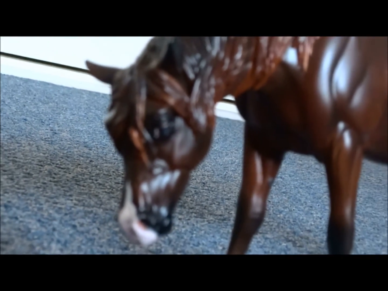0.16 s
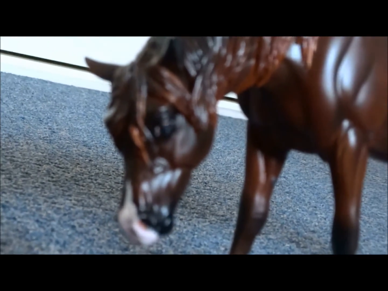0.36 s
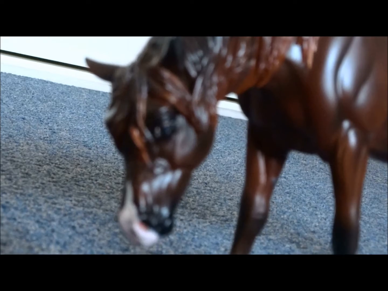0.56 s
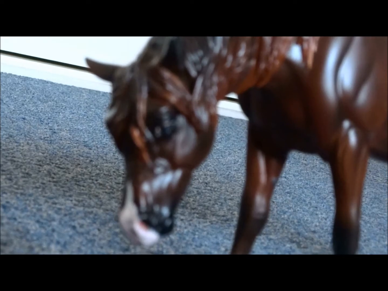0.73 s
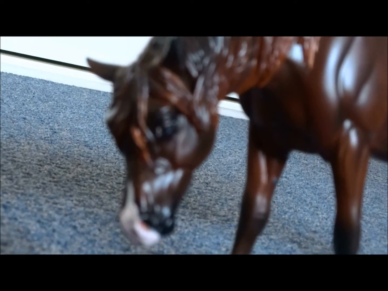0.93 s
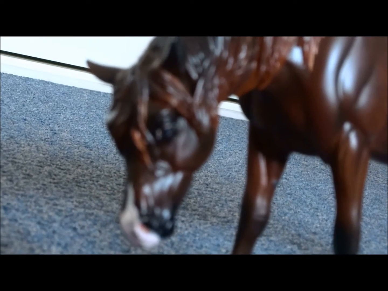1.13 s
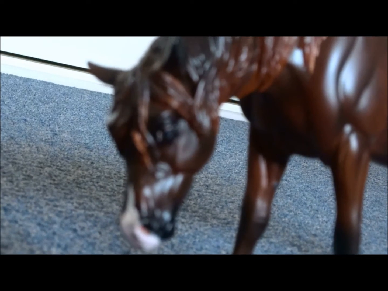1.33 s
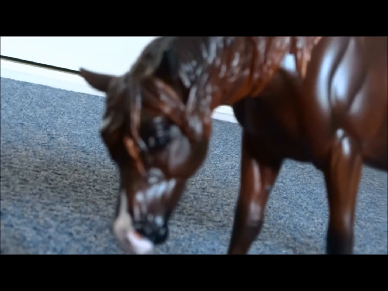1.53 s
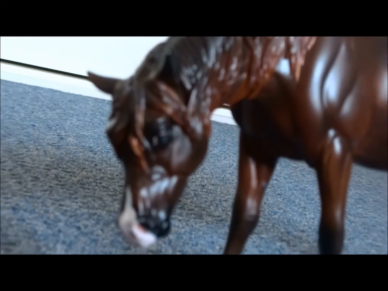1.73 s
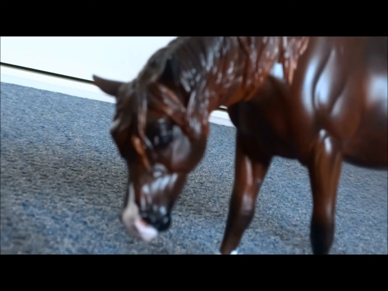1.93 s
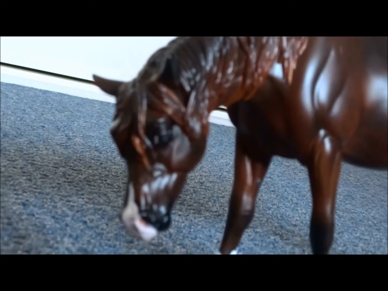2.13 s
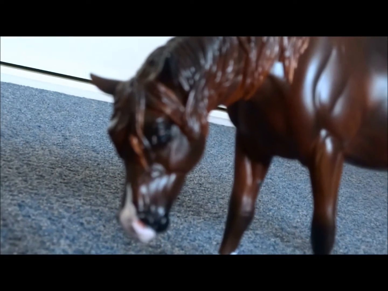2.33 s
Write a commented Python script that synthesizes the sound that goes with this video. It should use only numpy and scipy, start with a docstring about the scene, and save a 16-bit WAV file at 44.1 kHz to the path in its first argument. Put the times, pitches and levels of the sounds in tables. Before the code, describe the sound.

A camera autofocus motor whirs faintly in two short spells, with small clicks between.

```python
"""A quiet room, heard through the body of a camera whose lens hunts for focus.
Twice the motor runs fast, stops and creeps back: friction rings the barrel and the motor ring,
the gears whine and click, the ring squeaks. Between the spells the mechanism ticks faintly,
clacks twice and takes up its slack. A dull rustle and the room tone lie underneath."""
import sys
import numpy as np
from scipy import signal
from scipy.fft import rfft, irfft, next_fast_len
from scipy.io import wavfile
from scipy.ndimage import uniform_filter1d, map_coordinates

SR = 44100
rng = np.random.default_rng(int(sys.argv[2]) if len(sys.argv) > 2 else 0)


def file_out(sig):
    """Save sig as 16-bit WAV at sys.argv[1]."""
    # one column per channel
    cols = np.atleast_2d(sig).T
    # limit, then scale
    lim = np.clip(cols, -1, 1)
    pcm = np.round(lim * 32767).astype(np.int16)
    wavfile.write(sys.argv[1], SR, pcm)


N = 105443

# fast motor runs, one list each: time_s, barrel_db, low_ring_db, high_ring_db
FAST_LEVELS = [
    [(0, -45, -54, -55), (.014, -52.5, -58, -55), (.021, -47, -53, -49.5), (.030, -53, -67, -66),
     (.05, -73, -88, -86)],
    [(1.375, -67, -68, -79), (1.41, -51.5, -57.5, -67.5), (1.45, -43.5, -46.5, -55), (1.472, -45, -60, -59),
     (1.505, -50, -56.5, -59.5), (1.545, -49.5, -56.5, -54.5), (1.568, -50.5, -52, -47.5),
     (1.64, -50.5, -53.5, -54.5), (1.745, -50, -52, -50.5), (1.87, -51.5, -54.5, -56.5),
     (1.909, -52, -55.5, -58), (1.919, -51, -48.5, -49.5), (1.929, -63, -71, -74), (1.96, -80, -72, -74)],
]
# slow motor runs, one list each: time_s, rumble_db, barrel_db, low_ring_db, high_ring_db
SLOW_LEVELS = [
    [(.084, -57, -71, -80, -82), (.092, -70, -54, -69, -68), (.112, -65, -54.5, -57, -59.5),
     (.13, -69, -50, -59, -72), (.146, -71, -43.5, -55, -52), (.165, -58, -55, -55, -57.5),
     (.235, -52.5, -53.5, -60.5, -58.5), (.285, -60, -51.5, -58.5, -55), (.297, -71, -59.5, -67, -73),
     (.33, -55.5, -64.5, -74, -79), (.35, -75, -68, -88, -90)],
    [(1.984, -78, -79, -78, -80), (1.99, -80, -56, -75, -68), (2.005, -59, -55.5, -56.5, -60),
     (2.022, -73, -54.5, -66, -63), (2.036, -54.5, -48, -57, -62), (2.065, -73, -55, -57, -56.5),
     (2.085, -54, -53.5, -58, -57), (2.12, -53.5, -52, -56.5, -58.5), (2.184, -61, -54, -57, -52.5),
     (2.2, -58, -57.5, -69, -74), (2.24, -76, -74, -80, -74)],
]
# motor ring resonances: freq_hz, width_hz, fast_db, slow_db
RING_MODES = [(3550, 193, -10, -8.5), (4690, 160, -8, -4), (5010, 160, -7, -3.5), (5330, 280, -11.5, -5.5),
              (5850, 300, -9.5, -10), (6320, 250, -3, -7.5), (6810, 200, -4, -4.5), (7560, 125, -2.5, -4.5),
              (8280, 110, 4.5, -11), (8790, 200, -2, -17), (10250, 460, -10, -21), (10890, 320, 3, -5.5),
              (10970, 410, 1, -7.5), (11600, 88, -5.5, -41)]
# resonances of barrel, squeak, housing and idle tick: freq_hz, width_hz, gain_db
BARREL_MODES = [(570.6, 50.6, -1.5), (883, 117, -8), (1092, 46, 2.5), (1194, 71, 2), (1318, 183, -1.5),
                (1506, 145, -5), (1694, 53, 2.5), (1865, 64, -7), (2160, 63, -31.5), (2530, 130, -22),
                (2830, 130, -14.5)]
SQUEAK_MODES = [(4710, 300, 0)]
HOUSING_MODES = [(265, 157, -17), (541, 90, -2), (690, 145, -1.5), (1003, 133, 1), (1436, 280, -4.5),
                 (1568, 135, -1), (1845, 70, 2), (2553, 124, -3), (2888, 80, -3.5), (3510, 264, -4.5),
                 (4750, 250, -5.5), (6660, 1900, -11.5), (7650, 1500, -9), (8360, 430, -2.5)]
IDLE_MODES = [(509, 56, 4), (627, 70, -3.5), (844, 47, 0), (1450, 320, -37)]
# gear mesh overtones: harmonic, level_db
WHINE_HARMONICS = [(3, -3.5), (5, -5.5), (6, 0), (7, 3), (9, -2), (10, -6)]
# gear train contacts: time_s, peak_db, bass_db, treble_db, cutoff_hz
GEAR_CLICKS = [(.1135, -46, -2, 0, 9000), (0.1269, -36, -12, 11, 12000), (0.1342, -44.5, 19, -3, 4000),
               (1.1336, -40.5, 15, 5, 9000), (1.1378, -28, -8, 4, 3800), (1.161, -27, 4, -9, 8400),
               (1.2632, -47.5, -15, -2, 9000), (1.3825, -40, -9, 3, 3320), (1.403, -31, -10, -10, 9000),
               (1.4405, -25.5, -3, -3, 9100), (1.4537, -19, -0.5, 0.5, 8500),
               (1.488, -20.5, 15.5, 8.5, 9330), (1.535, -38.5, -2, 7, 5000), (1.99, -54, -6, -10, 1990),
               (2.0108, -30.5, -10, 12, 9300), (2.04, -51, -4, -5, 6000), (2.07, -38, -11, 5, 9500),
               (2.08, -43.5, 11, -5, 4500), (2.1146, -39.5, 6, -6, 1860)]
# stick-slip of the ring: centre_s, half_length_s, level_db
RING_SQUEAKS = [(0.115, .003, -50), (0.145, 0.0083, -51), (.173, .003, -52), (1.432, 0.0059, -42.5),
                (1.443, .003, -38.5), (2.007, 0.0015, -49.5), (2.039, 0.0034, -46), (2.069, 0.011, -47)]
# lens inching forward after the clacks: start_s, stop_s, level_db
CREEP_MOVE = (1.166, 1.272, -56.5)
# rustle leading into the second spell: time_s, level_db
RUSTLE_LEVELS = [
    [(.95, -87), (1.06, -67.5), (1.29, -66.5), (1.36, -66), (1.4, -64.5), (1.5, -81)],
]
# spectral shapes of the friction noises and room tone: freq_hz, gain_db
RING_EQ = [(1000, -30), (2200, 8), (3400, 4.5), (9000, -0.5), (9500, -2), (10000, 5), (11600, 0),
           (12300, 12), (13500, -13), (15000, -38)]
BARREL_EQ = [(100, -6), (400, -3.5), (1850, 1.5), (2050, -1), (2800, -1.5), (3200, -16), (8000, -35)]
RUMBLE_EQ = [(40, -18), (130, -23.5), (250, -10.5), (480, -3), (600, 1.5), (690, -6.5), (850, -5),
             (1100, -54), (3000, -58)]
CREEP_EQ = [(100, -19), (560, 5.5), (750, 2.5), (1800, -5), (2100, -9), (2600, -3), (4200, -12), (4800, -7),
            (6100, -20), (7200, -2), (8400, -4), (9500, -24), (14000, -32)]
RUSTLE_EQ = [(50, -3), (170, 1.5), (550, 4.5), (1100, -6.5), (2500, -18), (6000, -30), (12000, -45)]
ROOM_EQ = [(12, -41), (20, -11), (136, -6.5), (180, -5.5), (213, -1), (273, -8.5), (305, -3.5), (332, -7.5),
           (414, -2), (683, -7.5), (743, -3.5), (1040, -8.5), (2080, -13.5), (8350, -20.5), (15400, -27.5)]
# stereo width: freq_hz, side_gain_db
LENS_SIDE = [(200, -10.5), (600, -7.5), (1100, -7.5), (1700, -11.5), (2600, -6), (5000, -15),
             (10000, -13.5)]
ROOM_SIDE = [(60, -19), (180, -4.5), (550, 1), (1640, 2), (4960, -2.5), (14900, -26.5)]

FAST_GRAIN, SLOW_GRAIN = .15, .3  # friction roughness: std of log gain


def fast_runs(split_hz=7850, surge_db=4, whine_db=-6.5):
    """Motor at speed: friction drives a bright pulsing ring over the barrel and gear whine."""
    gear_gain, low_gain, high_gain = envelopes(FAST_LEVELS)
    modes = [(hz, width_hz, db) for hz, width_hz, db, _ in RING_MODES]
    ring = filtered(friction(FAST_GRAIN), resonances(modes), eq(RING_EQ))
    low_band = filtered(ring, lambda f: f < split_hz)
    low_ring = unit(low_band * drive_surge(surge_db / 2))
    high_ring = unit((ring - low_band) * drive_surge(surge_db))
    rub = barrel(FAST_GRAIN, flutter_db=2.6)
    whine = amp(whine_db) * np.array([gear_whine(), gear_whine()])
    return gear_gain * unit(rub + whine) + low_gain * low_ring + high_gain * high_ring


def slow_runs(split_hz=6100):
    """Motor creeping back: rougher friction, a duller whirr with a rumble."""
    rumble_gain, barrel_gain, low_gain, high_gain = envelopes(SLOW_LEVELS)
    modes = [(hz, width_hz, db) for hz, width_hz, _, db in RING_MODES]
    ring = filtered(friction(SLOW_GRAIN) * drive_surge(depth_db=.9), resonances(modes), eq(RING_EQ))
    low_band = filtered(ring, lambda f: f < split_hz)
    rumble = rumble_gain * unit(filtered(friction(SLOW_GRAIN), eq(RUMBLE_EQ)))
    rub = barrel_gain * barrel(SLOW_GRAIN, flutter_db=3.2)
    return rumble + rub + low_gain * unit(low_band) + high_gain * unit(ring - low_band)


def drive_surge(depth_db, rate_hz=60, crest_s=1.7517):
    """Gain of the drive pushing the motor in slightly uneven pulses."""
    cycles = rate_hz * (clock() - crest_s) + .073 * wobble(29.76)
    return amp(depth_db * np.cos(2 * np.pi * cycles))


def barrel(grain, flutter_db, tooth_hz=181):
    """Gear teeth rub and ring the barrel."""
    flutter = amp(flutter_db * np.sin(2 * np.pi * tooth_hz * clock()))
    return unit(filtered(friction(grain) * flutter, resonances(BARREL_MODES), eq(BARREL_EQ)))


def gear_whine(pitch_hz=186, wander=.0106):
    """Gear mesh overtones, unsteady in pitch and level."""
    phase = 2 * np.pi * np.cumsum(pitch_hz * (1 + wander * wobble(25.04))) / SR
    return unit(sum(amp(db + 1.4 * wobble(30.15)) * np.sin(k * phase + rng.uniform(0, 2 * np.pi))
                    for k, db in WHINE_HARMONICS))


def gear_clicks(blow=4.0, click_t60_s=.007, rattle_t60_s=.055, bass_hz=660, treble_hz=3900):
    """Parts scrape, strike and rattle; each contact rings the housing."""
    out, lead = np.zeros((2, N + SR)), SR // 50
    t = (np.arange(SR // 7) - lead) / SR
    scrape = amp(-10) * np.exp(-np.abs(t) / .003)
    decay = amp(-60 * np.abs(t) / click_t60_s)
    rattle = amp(-16 - 60 * np.abs(t) / rattle_t60_s)
    envelope = np.where(t < 0, scrape, decay + rattle)
    for time_s, peak_db, bass_db, treble_db, cutoff_hz in GEAR_CLICKS:
        force = rng.standard_normal((2, len(t))) * envelope
        force[0, lead + SR // 2000] += blow  # mid only
        bass = lambda f: amp(bass_db / (1 + (f / bass_hz) ** 4))
        treble = lambda f: amp(treble_db * (1 - 1 / (1 + (f / treble_hz) ** 4)))
        lowpass = lambda f: 1 / np.sqrt(1 + (f / cutoff_hz) ** 8)
        hit = filtered(force, resonances(HOUSING_MODES), bass, treble, lowpass)
        start = round(time_s * SR) - lead
        out[:, start:start + len(t)] += amp(peak_db) * hit / np.abs(hit[0]).max()
    return out[:, :N]


def ring_squeaks():
    """The ring catches briefly and sings on one resonance."""
    swell = sum(amp(db) * np.exp(-((clock() - centre_s) / half_s) ** 2)
                for centre_s, half_s, db in RING_SQUEAKS)
    mode = resonances(SQUEAK_MODES)
    return swell * unit(filtered(noise(), mode, mode))


def motor_creep(edge_s=.0077):
    """Short soft hiss of the barely turning motor."""
    start_s, stop_s, level_db = CREEP_MOVE
    gate = np.clip(np.minimum(clock() - start_s, stop_s - clock()) / edge_s + .5, 0, 1)
    return amp(level_db) * gate * unit(filtered(friction(FAST_GRAIN), eq(CREEP_EQ)))


def idle_ticks(count=14, start_s=.572, period_s=.04, level_db=-61.5, t60_s=.067):
    """Soft, evenly spaced ticks while the lens rests."""
    envelope = np.zeros(N)
    for k, db in enumerate(rng.normal(level_db, .88, count)):
        age_s = clock() - start_s - k * period_s
        envelope += (age_s > 0) * amp(db - 60 * np.abs(age_s) / t60_s)
    steady_rms = filtered(noise(), resonances(IDLE_MODES)).std()
    return filtered(noise() * envelope, resonances(IDLE_MODES)) / steady_rms


def rustle():
    """Faint dull friction, as of a hand on the camera."""
    return envelopes(RUSTLE_LEVELS)[0] * unit(filtered(friction(SLOW_GRAIN), eq(RUSTLE_EQ)))


def room_tail(x, t60_s=.6, wet_db=-25):
    """Weak diffuse decay of x in the room."""
    t = np.arange(SR // 2) / SR
    tail = rng.standard_normal((2, len(t))) * amp(-60 * t / t60_s)
    return amp(wet_db) * signal.fftconvolve(x, tail / np.linalg.norm(tail[0]), axes=1)[:, :N]


def room_tone(level_db=-66.5):
    """Steady, dark background noise."""
    return amp(level_db) * unit(filtered(noise(), eq(ROOM_EQ)))


def amp(db):
    """Decibels to gain."""
    return 10 ** (np.asarray(db) / 20)


def unit(x):
    """Scale to rms 1."""
    return x / np.sqrt(np.mean(x ** 2) + 1e-20)


def clock():
    """Sample times in seconds."""
    return np.arange(N) / SR


def noise():
    """Independent white noises: mid, side."""
    return rng.standard_normal((2, N))


def friction(grain):
    """Noise in millisecond grains of uneven strength."""
    return noise() * np.exp(grain * unit(uniform_filter1d(rng.standard_normal(N), size=60)))


def wobble(rate_hz):
    """Smooth curve through random knots."""
    return map_coordinates(rng.standard_normal(int(N * rate_hz / SR) + 4), [clock() * rate_hz])


def envelopes(runs):
    """One gain curve per level column, silent outside the runs."""
    gains = 0
    for run in runs:
        time_s, *columns_db = np.transpose(run)
        gains += amp([np.interp(clock(), time_s, db, -150, -150) for db in columns_db])
    return gains


def eq(points):
    """Response through freq_hz, gain_db points on a log axis."""
    hz, db = np.transpose(points)
    return lambda f: amp(np.interp(np.log(f + 1), np.log(hz), db))


def resonances(modes):
    """Causal response of parallel modes, alternating in sign."""
    return lambda f: sum((-1) ** k * amp(db) * 1j * f * width_hz / (hz * hz - f * f + 1j * f * width_hz)
                         for k, (hz, width_hz, db) in enumerate(modes))


def filtered(x, *responses):
    """x through frequency responses in series."""
    length = x.shape[-1]
    padded = next_fast_len(length + 4096)
    freq_hz = np.fft.rfftfreq(padded, 1 / SR)
    spectrum = rfft(x, padded)
    for response in responses:
        spectrum = spectrum * response(freq_hz)
    return irfft(spectrum, padded)[..., :length]


def stereo(pair, side_eq):
    """Mid and side to left and right."""
    mid, side = pair[0], filtered(pair[1], eq(side_eq))
    return np.array([mid + side, mid - side])


def scene():
    """Lens mechanism over the room."""
    motor = fast_runs() + slow_runs() + motor_creep() + ring_squeaks()
    lens = motor + gear_clicks() + idle_ticks() + rustle()
    return stereo(lens, LENS_SIDE) + stereo(room_tone() + room_tail(lens), ROOM_SIDE)


def record(dry):
    """Camera band limit, 15.5 kHz."""
    return filtered(dry, lambda f: f < 15500)


dry = scene()
out = record(dry)
file_out(out)
```